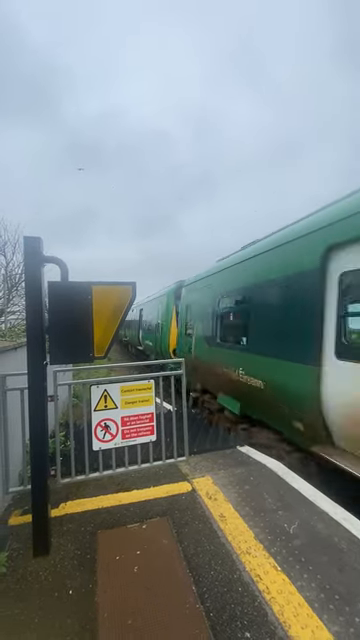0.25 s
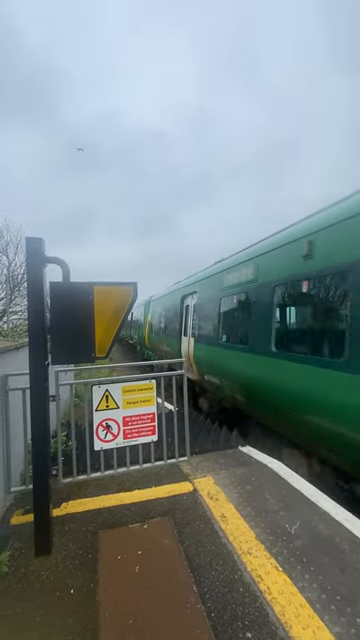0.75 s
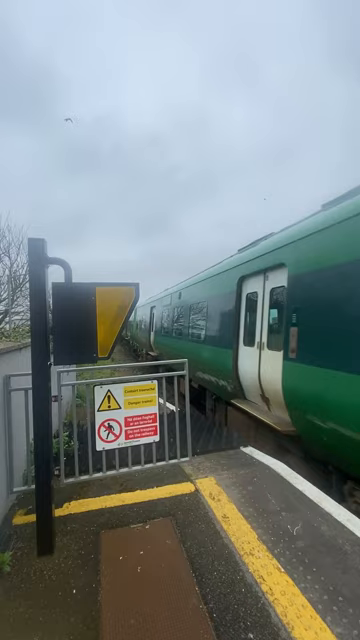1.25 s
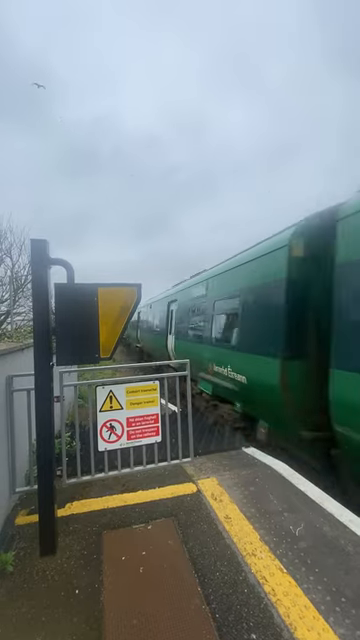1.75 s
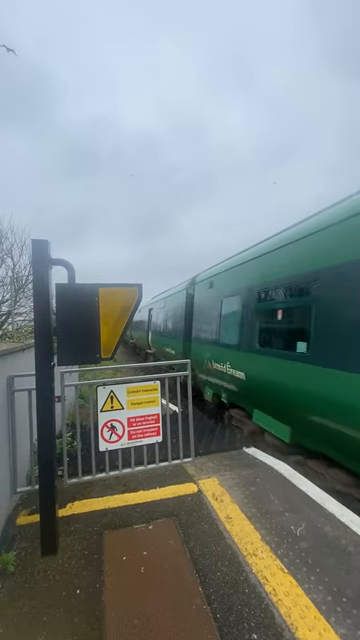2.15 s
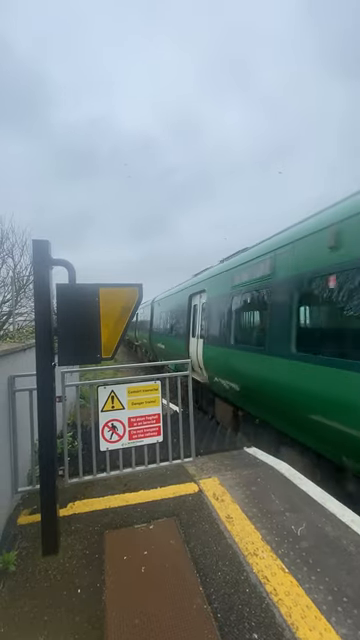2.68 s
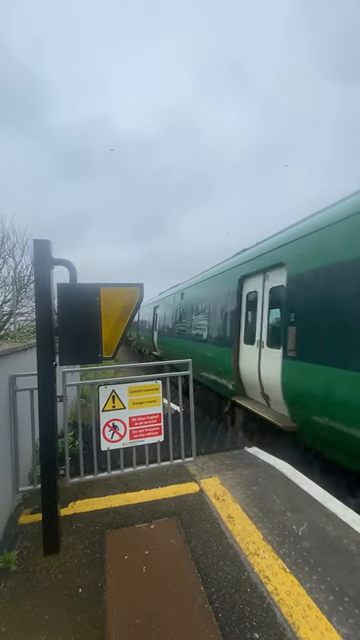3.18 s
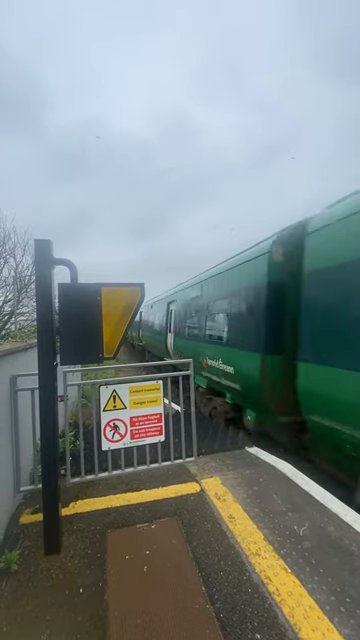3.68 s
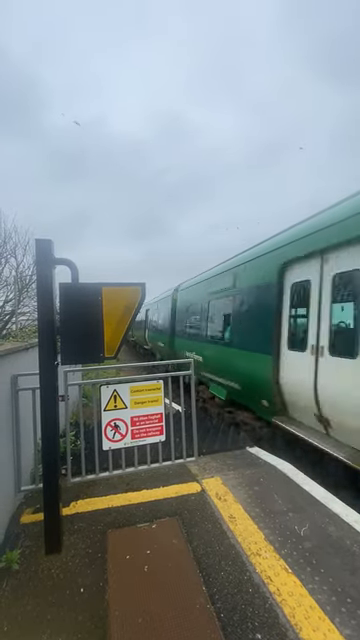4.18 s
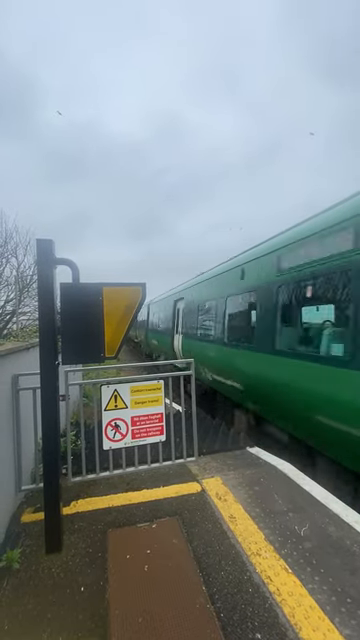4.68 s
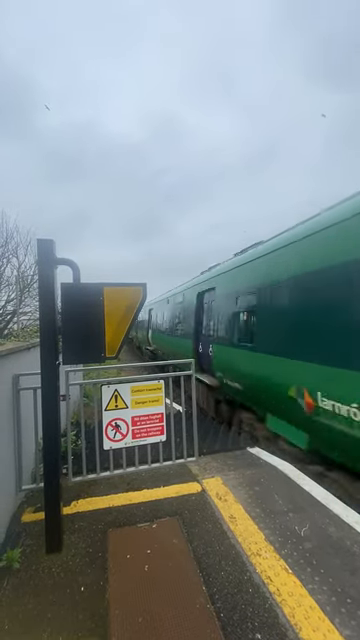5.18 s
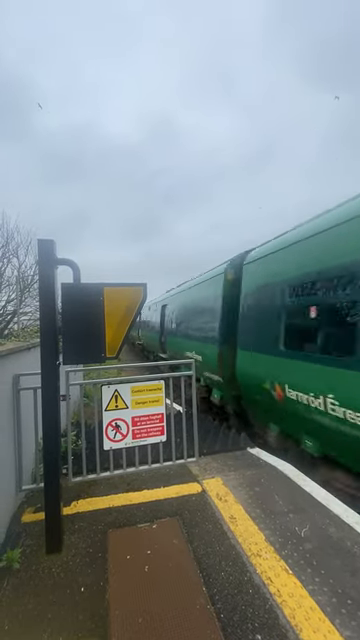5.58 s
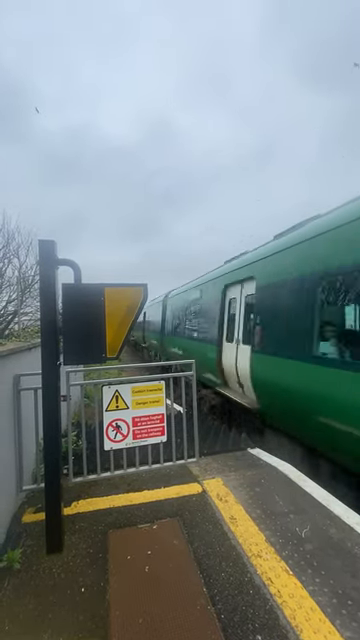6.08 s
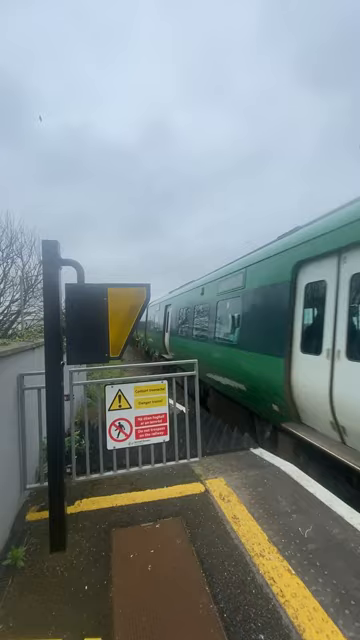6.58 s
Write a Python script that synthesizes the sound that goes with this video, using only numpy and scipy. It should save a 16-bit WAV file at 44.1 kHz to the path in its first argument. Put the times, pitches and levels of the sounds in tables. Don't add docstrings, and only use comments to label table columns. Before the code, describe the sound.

Diesel carriages pass close to a handheld phone outdoors. A bassy engine hum, swelling and wavering as each underfloor motor goes by, carries the whole passage. Over it, wheels rumble and hiss in waves, heaviest at the start. Narrow high flange and brake singing appears in short fluttering bursts, with soft low thuds from a rail joint and a brief fast chuffing of air. No ending; the train keeps rolling.

```python
import sys
import numpy as np
from scipy import signal
from scipy.fft import rfft, irfft, next_fast_len
from scipy.io import wavfile
from scipy.ndimage import uniform_filter1d, map_coordinates

SR = 44100
rng = np.random.default_rng(int(sys.argv[2]) if len(sys.argv) > 2 else 0)


def wav_record(signal):
    frames = np.transpose(np.atleast_2d(signal))
    bounded = np.clip(frames, -1, 1)
    quanta = np.round(bounded * 32767).astype(np.int16)
    wavfile.write(sys.argv[1], SR, quanta)


def undo_db(level):
    steps = np.asarray(level, float) / 20
    return 10 ** steps


N = 301658
TIME = np.arange(N) / SR


def unit(x):
    return x / np.sqrt(np.mean(x ** 2) + 1e-20)


def along(points, hz):
    f, v = np.transpose(points)
    return np.interp(np.log(hz + 1), np.log(f + 1), v)


def wobble(rate_hz):
    coarse = TIME[::64]
    knots = rng.standard_normal(int(N * rate_hz / SR) + 4)
    return np.interp(TIME, coarse, map_coordinates(knots, [coarse * rate_hz]))


def filtered(x, response):
    m = next_fast_len(N + 8192)
    spectrum = rfft(x, m) * response(np.fft.rfftfreq(m, 1 / SR))
    return irfft(spectrum, m)[..., :N]


def rush(spectrum, patchy_db):
    z = signal.stft(rng.standard_normal((2, N)), nperseg=512)[2]
    field = uniform_filter1d(rng.standard_normal(z.shape[1:]), size=6, axis=0)
    field = uniform_filter1d(field, size=10, axis=1)
    pair = signal.istft(z * undo_db(patchy_db * unit(field)), nperseg=512)[1][:, :N]
    return unit(filtered(pair, lambda hz: undo_db(along(spectrum, hz))))


# freq_hz [Hz], density_db [dB per Hz]
RUMBLE_SPECTRUM = [(20, -30), (40, -12), (62, -2.5), (120, -1.5), (250, -3), (400, -11), (700, -16),
                   (1200, -50)]
ROAR_SPECTRUM = [(150, -36), (350, -4.5), (600, 0), (900, 2), (1500, -1.5), (2200, -5.5), (3200, -15),
                 (5000, -32)]
AIR_SPECTRUM = [(1500, -11), (2100, -2), (2600, 6), (3800, -2), (5000, 3.5), (6300, 2), (7500, -8),
                (8500, -2), (10500, -28)]
FIZZ_SPECTRUM = [(5000, -40), (7000, 7), (8500, 5), (10000, 1.5), (11500, 0), (13000, -2), (15000, -4),
                 (16000, -4)]
# pass_s [s], reach_s [s to cover closest distance], roar_db, air_db, fizz_db [dB]
BOGIES = [(0, 0.21, -25, -26, -34), (.42, 0.23, -27, -29.5, -34.5), (.72, 0.19, -40, -36, -41.5),
          (1.1, 0.46, -36.5, -39.5, -45.5), (1.6, 0.23, -54, -42.5, -47), (2.65, 0.28, -36.5, -45, -50),
          (2.98, 0.38, -36, -44.5, -52), (3.95, 0.18, -40, -60, -54), (4.25, 0.35, -32, -39, -42),
          (5.22, 0.25, -40, -43, -44), (6.2, 0.54, -34, -52, -50), (6.5, 0.33, -34, -41.5, -56)]
# roar_db, air_db, fizz_db [dB]
FAR_DB = (-37.5, -49, -52)


def rolling():
    power = undo_db(np.array(FAR_DB))[:, None] ** 2 + np.zeros(N)
    for pass_s, reach_s, *levels_db in BOGIES:
        nearness = 1 / (1 + ((TIME - pass_s) / reach_s) ** 2) ** 1.62
        power = power + undo_db(np.array(levels_db))[:, None] ** 2 * nearness
    roar, air, fizz = np.sqrt(power)
    shake, gust = wobble(14), wobble(9)
    rumble = undo_db(-31.5 + 1.5 + 0.74 * wobble(5)) * (roar / roar.mean()) ** 0.083
    roar = roar * undo_db(1.5 + 0.5 * shake + 0.2 * gust)
    air = air * undo_db(9.0 + 0.8 * shake + 0.79 * gust)
    fizz = fizz * undo_db(10.5 + 1.1 * shake + 0.92 * gust)
    low = rumble * rush(RUMBLE_SPECTRUM, patchy_db=0.56) + roar * rush(ROAR_SPECTRUM, patchy_db=0.88)
    high = air * rush(AIR_SPECTRUM, patchy_db=1.5) + fizz * rush(FIZZ_SPECTRUM, patchy_db=-0.5)
    return low + high


# start_s [s], pitch_hz [Hz], peak_db [dB]
THUMPS = [
    (1.9, 196, -24.5),
    (4.371, 183, -13),
    (5.54, 163, -14.5),
    (6.098, 171, -17),
]


def thumps():
    knock, t = np.zeros(N), TIME[:SR // 5]
    for start_s, pitch_hz, peak_db in THUMPS:
        envelope = undo_db(peak_db + 5.5 - 60 * t / 0.12) * (1 - np.exp(-t / 0.018))
        knock[round(start_s * SR):][:len(t)] += envelope * np.sin(2 * np.pi * pitch_hz * t)
    return knock


# pass_s [s], pitch_hz [Hz], level_db, second_partial_db [dB], reach_s [s]
GENERATORS = [
    (1.4, 73.55, -29.5, -36.5, 0.436),
    (5.2, 75.24, -29, -33.5, 0.41),
]


def generators():
    hum = np.zeros(N)
    for pass_s, pitch_hz, level_db, second_db, reach_s in GENERATORS:
        away = (TIME - pass_s) / reach_s
        distance = np.sqrt(1 + away ** 2)
        phase = 2 * np.pi * np.cumsum(pitch_hz * (1 - 0.046 * away / distance)) / SR
        hum += undo_db(level_db + 2.5 + 2.3 * wobble(2.73)) * np.sin(phase) / distance ** 1.2
        hum += undo_db(second_db + 3.0) * np.sin(2 * phase) / distance ** 5.8
    return hum


# freq_hz [Hz], density_db [dB per Hz]
PUFF_SPECTRUM = [(1500, -10), (3000, -5), (5200, 5.5), (7500, -3.5), (12000, -5), (16000, -24)]


def ticks():
    first_s, cycle_s, stretch_s = 4.5436, 0.06454, 0.000068
    peak_db, scatter_db, pass_s, reach_s = -21, 1.6, 4.35, 0.54
    swell, t = np.zeros(N), TIME[:SR // 8]
    cycles = range(-13, 14)
    for k, (late, size) in zip(cycles, rng.standard_normal((len(cycles), 2))):
        start_s = first_s + cycle_s * k + stretch_s * k * k + 0.0022 * late
        level = undo_db(peak_db + scatter_db * size) / np.hypot(1, (start_s - pass_s) / reach_s)
        puff = undo_db(-2 - 60 * t / 0.085) * (1 - np.exp(-t / 0.0025))
        swell[round(start_s * SR):][:len(t)] += level * puff
    return swell * rush(PUFF_SPECTRUM, patchy_db=1.4)


WHEEL_MODES = {"flange": [(6770, 160, 7), (7060, 210, 1.5), (6986, 75, -5), (13900, 390, -4)],
               "tread": [(5045, 83, 1.5), (4965, 54, -3), (12400, 300, -8.5)], "web": [(5800, 130, 1),
               (5620, 150, -1)], "disc": [(7040, 190, 7), (7260, 130, 1)], "brake": [(9083, 124, 1.5),
               (8790, 94, 0.5), (9330, 150, -8)], "pad": [(10950, 110, -2), (10800, 52, -1),
               (10730, 210, 0)], "rear tread": [(5080, 160, 2), (5400, 200, -6)],
               "rear flange": [(6800, 100, 5)], "shoe": [(12840, 750, 8.5)], "scrape": [(5470, 1700, -2)],
               "spring": [(15000, 680, 6.5)]}
HUM_MODES = {"frame": [(215.8, 9.5, -0.5), (231.7, 9.9, -5.5)], "cab": [(733, 10, -6.5), (583, 16, -19)],
             "first": [(858, 9.9, -5), (848, 10.5, -1.5), (765, 11, -2.5)], "second": [(910, 9.2, -16),
             (768, 6.9, 3)], "third": [(862, 12, -1.5), (758, 6.6, -6), (1170, 30, -7.5), (1342, 33, -7)]}
WHEEL_BURSTS = {"flange": [(.7, 1.3, 1.5, -38.5), (1.5, 1.9, 2.4, -34), (2.3, 2.9, 3.74, -32.5)],
                "tread": [(1.35, 1.43, 1.57, -28.5), (1.59, 1.64, 1.757, -27)],
                "web": [(1.3, 1.45, 1.9, -36.5), (1.53, 1.57, 1.62, -29.5)],
                "disc": [(4.14, 4.3, 4.62, -39.5), (5.06, 5.2, 5.45, -30.5)],
                "brake": [(2.3, 2.8, 4, -45.5), (3.25, 3.36, 3.8, -42), (3.8, 4.08, 4.55, -41.5),
                (4.6, 4.85, 5.3, -34.5), (5.42, 5.52, 6.03, -29.5), (5.85, 6.36, 7.04, -29)],
                "pad": [(3.2, 3.9, 4.4, -44), (4.1, 4.8, 5.2, -41), (5.1, 5.55, 6, -36.5),
                (5.95, 6.05, 6.38, -37.5)], "rear tread": [(6.2, 6.3, 6.42, -50), (6.42, 6.65, 6.9, -34)],
                "rear flange": [(6.05, 6.15, 6.6, -46)], "shoe": [(6.4, 6.68, 7.1, -41)],
                "scrape": [(4.11, 4.14, 4.45, -29.5), (4.46, 4.485, 4.58, -32)],
                "spring": [(5.1, 5.36, 5.55, -43)]}
HUM_BURSTS = {"frame": [(0, .4, 0.55, -30.5), (1.2, 1.75, 2.07, -34), (3.6, 4.25, 4.45, -33),
              (4.7, 5.1, 5.8, -34.5)], "cab": [(0, .02, .28, -30.5), (.25, .33, 0.666, -26.5)],
              "first": [(2.55, 2.72, 3.38, -35)], "second": [(4.08, 4.18, 4.4, -41)],
              "third": [(5.8, 5.95, 6.35, -38.5), (6.15, 6.4, 6.75, -32)]}


def squeals():
    sag_db, roundness, edge_s = 8.5, 1.16, 0.03
    song, f = np.zeros((2, N)), np.fft.rfftfreq(next_fast_len(2 * SR), 1 / SR)
    bursts = {**WHEEL_BURSTS, **HUM_BURSTS}
    for name, modes in {**WHEEL_MODES, **HUM_MODES}.items():
        body = sum(undo_db(db) * width ** 1.508 / (width + 1.3j * (f - hz)) ** 2 for hz, width, db in modes)
        flutter_db = 1.76 * wobble(18) if name in WHEEL_MODES else 2.6 * wobble(15)
        for start_s, loudest_s, end_s, peak_db in bursts[name]:
            first, last = round((start_s - edge_s) * SR), round((end_s + edge_s) * SR)
            span = slice(max(first, 0), min(last, N))
            t = TIME[span]
            friction = rng.standard_normal((2, 2 * len(f) - 2))
            ring = irfft(rfft(friction) * body)[:, :len(t)] * 120
            edge = np.clip(np.minimum(t - start_s, end_s - t) / edge_s + 1, 0, 1)
            swell_db = -sag_db * np.interp(t, [start_s, loudest_s, end_s], [1, 0, 1]) ** roundness
            song[:, span] += edge * undo_db(peak_db + swell_db + flutter_db[span]) * ring
    return song


# pass_s [s], pitch_hz [firing, Hz], reach_s [s], drift_hz_per_s [Hz/s]
ENGINES = [
    (-0.24, 93.65, 0.248, -0.091),
    (2.976, 95.563, 0.097, -0.204),
    (6.216, 95.429, 0.364, 0.206),
    (6.647, 94.594, 0.176, -0.137),
]
# time_s [s], exhaust_db, block_db [dB]
GONE_LEVELS = [(0.0, -11, -29), (0.35, -24, -33.5), (0.75, -18.0, -35), (1.2, -19.5, -37), (1.6, -44, -36),
               (2.1, -36, -52), (2.6, -22, -57.9), (3.1, -32, -44), (3.5, -50.0, -58)]
FIRST_LEVELS = [(0.0, -20, -27), (0.5, -17.5, -37), (1.0, -23, -41), (1.3, -28.5, -48), (1.8, -17, -33),
                (2.3, -16.7, -36.5), (2.6, -15, -29.5), (2.85, -11.5, -31), (3.2, -20, -30.5),
                (3.6, -19.5, -31.5), (4.0, -18.5, -40), (4.4, -18.5, -33.4), (4.9, -25, -49),
                (5.4, -24.6, -49), (6.0, -34, -49.0), (6.84, -21.5, -56.1)]
SECOND_LEVELS = [(2.1, -48, -57), (2.5, -16.5, -50.9), (3.1, -21.5, -54), (3.7, -25.5, -41.1),
                 (4.3, -22, -51), (5.0, -21.5, -33), (5.5, -16.0, -34.8), (5.9, -13.5, -33),
                 (6.25, -18, -25.5), (6.55, -13.5, -43), (6.84, -14.5, -27)]
THIRD_LEVELS = [(5.5, -48, -60.0), (5.9, -28.6, -38), (6.2, -16.5, -55.9), (6.451, -24.5, -30),
                (6.84, -11, -28.5)]
CRANKS = [(0.938, 0.715), (0.242, 0.719), (1.036, 0.921), (-0.042, 0.034)]
ABREAST_S = [0.12, 2.86, 6.3, 6.45]
# multiple [of firing pitch], level_db [dB over half order], rough_rad [rad]
BLOCK_PARTIALS = [(3 / 2, -4, 0.24), (2, -5.5, 0.68), (7 / 3, -18.5, 0.64), (5 / 2, -10.5, 0.67)]


def engines():
    drone = np.zeros(N)
    levels = (GONE_LEVELS, FIRST_LEVELS, SECOND_LEVELS, THIRD_LEVELS)
    for engine, rows, (turn, half_turn), abreast_s in zip(ENGINES, levels, CRANKS, ABREAST_S):
        pass_s, pitch_hz, reach_s, drift_hz_per_s = engine
        since = TIME - pass_s
        emitted_s = TIME - 0.03003 * np.hypot(reach_s, since)
        phase = 2 * np.pi * (turn + pitch_hz * emitted_s + drift_hz_per_s * since ** 2 / 2)
        time_s, *levels_db = np.transpose(rows)
        exhaust, block = (undo_db(np.interp(TIME, time_s, db, left=-99, right=-99)) * np.sqrt(2)
                          for db in levels_db)
        drone += exhaust * (np.cos(phase) + undo_db(-29.0) * np.cos(phase * 5 / 6))
        drone += block * np.cos(phase / 2 + 2 * np.pi * half_turn)
        near = block / (1 + ((TIME - abreast_s) / 0.43) ** 2)
        swing, drift = undo_db(2.5 * wobble(4.5)), wobble(14)
        upper = sum(undo_db(db) * np.cos(k * phase + rough * drift) for k, db, rough in BLOCK_PARTIALS)
        drone += near * swing * upper
    return drone


# freq_hz [Hz], lead_rad [rad]
PORT_LEAD = [(0, 0), (1720, 0), (2670, 3.2), (4050, .6), (4740, 1.9), (5510, .5), (6550, 2.2), (7800, 3.2),
             (9500, 5.2), (9750, 6.2), (11000, 6.4), (13150, 9.3), (14400, 9.5), (15800, 12.4)]
# freq_hz [Hz], tilt_db [dB]
PORT_TILT = [(100, 0.33), (400, -3), (750, 0.5), (1400, 3.5), (2900, 1), (3700, 2.3), (4200, -1),
             (7500, -1.1), (8200, 5), (9000, -0.5)]
# freq_hz [Hz], shared_share [0-1]
PORT_ALIKE = [(100, 0.99), (300, 0.97), (650, 0.42), (1300, 0.74), (2000, 0.73), (2800, 0.77), (4200, 0.43),
              (7800, 0.84), (9650, 1), (11000, 0.8), (12300, 0.91), (13100, 0.8), (14400, 0.69),
              (15000, 0.55)]


def ports(direct, scattered):
    sides = np.array([[1], [-1]])

    def turn(hz):
        return np.arccos(np.clip(along(PORT_ALIKE, hz), 0, 1)) / 2

    def port(hz):
        lead_rad = np.interp(hz, *np.transpose(PORT_LEAD))
        return undo_db(sides * along(PORT_TILT, hz) / 2) * np.exp(sides * 0.5j * lead_rad)

    shared = filtered(direct, lambda hz: port(hz) * np.cos(turn(hz)))
    opposed = filtered(scattered, lambda hz: sides * port(hz) * np.sin(turn(hz)))
    return shared + opposed


def scene():
    direct, scattered = rolling() + squeals() + ticks()
    tones = generators() + thumps() + engines()
    return ports(direct + tones, scattered + 0.87 * np.roll(tones, 120))


def band_limit(x):
    return signal.sosfilt(signal.butter(12, 17090, fs=SR, output="sos"), x)


def record(dry):
    mix = filtered(dry, lambda hz: hz < 15760)
    return band_limit(mix)


dry = scene()
out = record(dry)
wav_record(out)
```